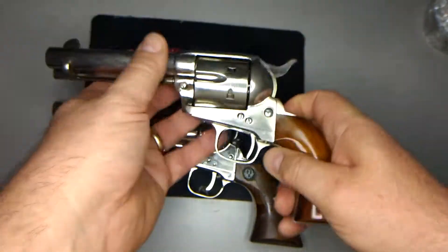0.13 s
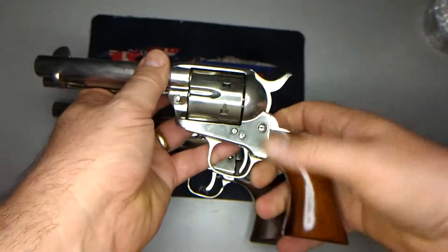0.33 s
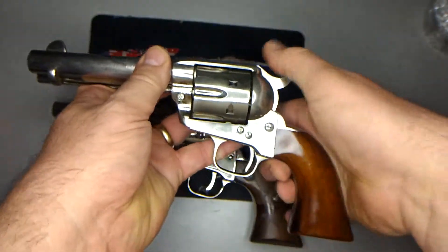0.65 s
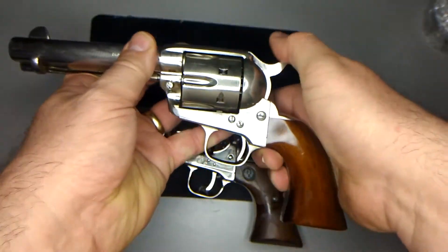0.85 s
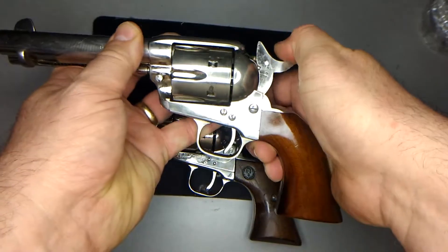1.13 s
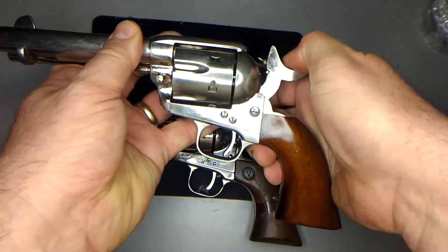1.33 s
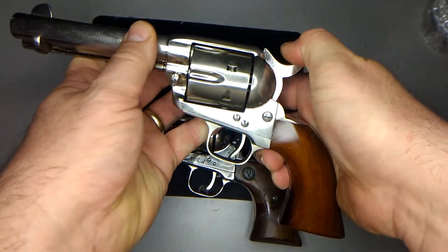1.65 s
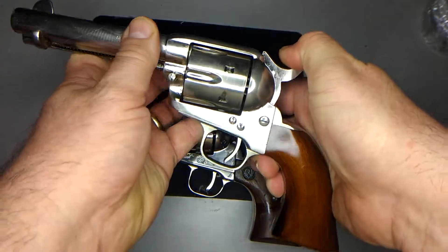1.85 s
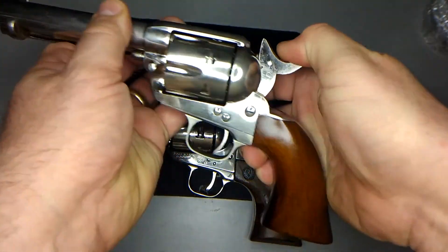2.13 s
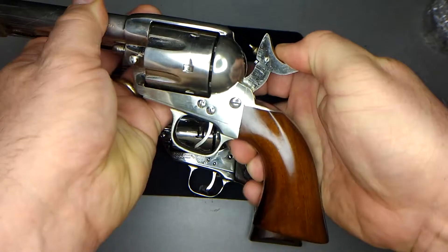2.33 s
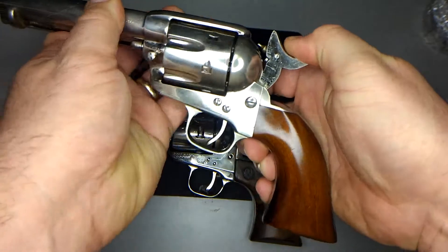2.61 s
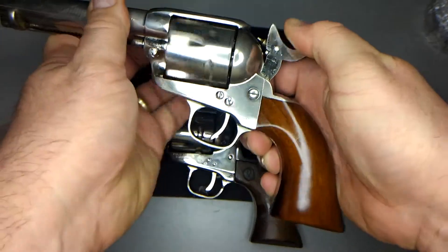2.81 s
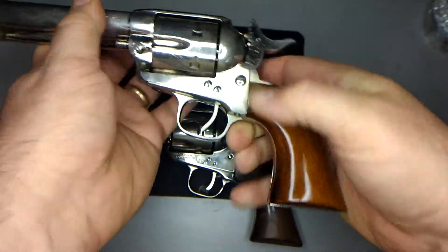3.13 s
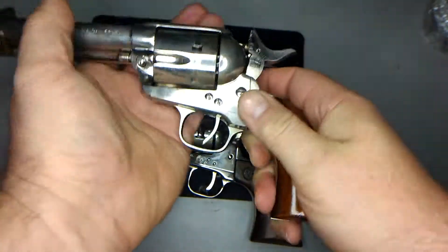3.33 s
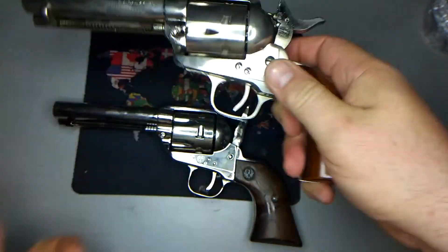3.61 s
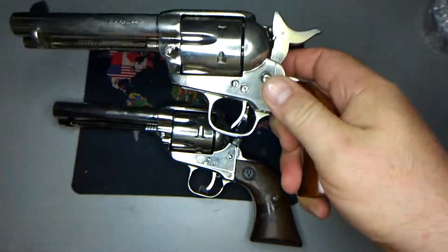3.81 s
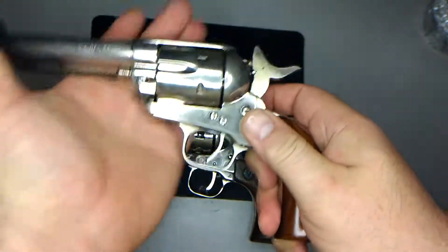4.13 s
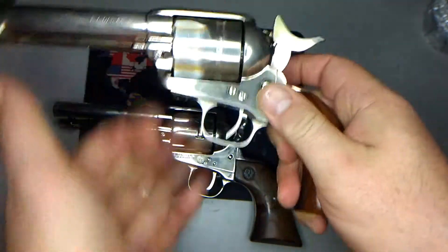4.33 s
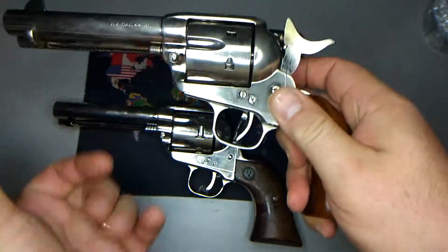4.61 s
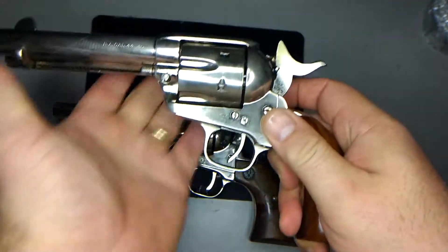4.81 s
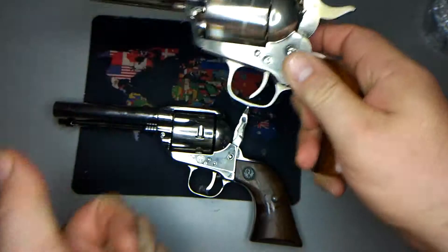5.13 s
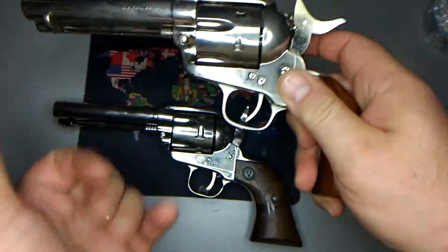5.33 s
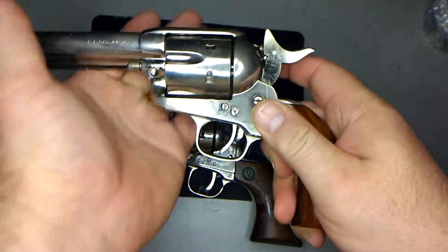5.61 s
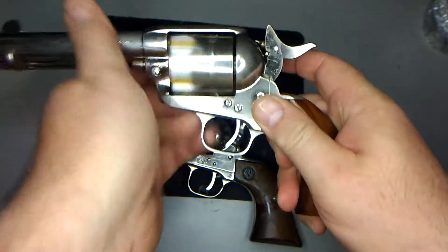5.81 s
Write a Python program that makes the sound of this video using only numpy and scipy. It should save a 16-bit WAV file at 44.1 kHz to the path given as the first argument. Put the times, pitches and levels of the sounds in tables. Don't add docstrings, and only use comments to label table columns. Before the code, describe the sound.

Close in a quiet room, hard metallic hammer clicks are followed by four quick whirring ratchet rattles of a hand-spun revolver cylinder.

```python
import sys
import numpy as np
from scipy import signal
from scipy.fft import rfft, irfft, next_fast_len
from scipy.io import wavfile
from scipy.ndimage import uniform_filter1d

SR = 44100
rng = np.random.default_rng(int(sys.argv[2]) if len(sys.argv) > 2 else 0)


def gain_from_db(level_db):
    decades = np.asarray(level_db, float) / 20
    return 10 ** decades


def dump(signal):
    limited = np.clip(np.atleast_2d(signal).T, -1, 1)
    pcm = np.round(limited * 32767).astype(np.int16)
    wavfile.write(sys.argv[1], SR, pcm)


N = 262832
CLICK_LEN = 8192

# (time [s], level [dB], brightness [dB])
SPINS = [
    (3.4691, -27, -0.5),
    (4.275, -28, -1),
    (5.0572, -25.5, -1.5),
    (5.829, -25.5, -2),
]
# (time [s], level [dB])
TEETH = [(3.5040, -30.5), (3.5226, -30), (3.54, -31), (3.558, -31.5), (3.5785, -31.5), (3.601, -28.5),
         (3.6315, -29.5), (4.3359, -29.5), (4.3575, -32.5), (4.3737, -33), (4.3907, -31), (4.41, -33),
         (4.43, -30.5), (4.4542, -31.5), (4.49, -33), (5.08, -31), (5.095, -31), (5.1100, -33),
         (5.1262, -30.5), (5.146, -32), (5.165, -31.5), (5.1895, -32.5), (5.2229, -32), (5.8472, -31),
         (5.864, -29.5), (5.8921, -33), (5.9295, -32)]
# (frequency [Hz], level [dB], t60 [s])
FRAME = [(1141, -9.5, 0.0098), (1282, -8, 0.0075), (2445, -6.5, 0.049), (2790, 0, 0.035),
         (3237, -5.5, 0.072), (3340, -15, 0.055), (3970, -9, 0.054)]
# (frequency [Hz], level [dB], t60 [s])
CYLINDER = [(4828, 2.5, 0.06), (5150, -38, 0.058), (5047, -1.5, 0.089), (5175, 3, .05), (5610, -0.5, 0.15),
            (5940, -11, 0.042), (6000, -30, 0.071), (6172, 2.5, 0.16), (7200, -5.5, 0.06),
            (7490, -1.5, .05), (7200, -17, 0.14), (8340, -8.5, 0.06)]


def hammer():
    # (time [s], level near 5.5 kHz [dB], then over that near 1.2, 3 and 8 kHz [dB])
    notches = [
        (1.0150, -26.5, 2.5, 12, -3),
        (1.6755, -30.5, -0.5, 3.5, 10),
        (1.6782, -36, -4, -1, -4),
        (2.3567, -28, -1, 12.5, 0),
        (2.8556, -25, -6, 6, 3.5),
    ]
    # (frequency [Hz], level [dB], t60 [s])
    sear_1 = [(870, -4, 0.019), (1410, -2, 0.016), (2210, 0, 0.032), (3195, 8.5, 0.017), (3650, -2, 0.014),
              (5710, -2.5, 0.031), (12450, -14, 0.013)]
    sear_2 = [(773, 0, 0.022), (3030, -4.5, 0.015), (4610, 9, 0.0062), (5930, -12, 0.0086),
              (7220, -8, 0.017)]
    sear_3 = [(1490, -0.5, 0.012), (2500, 4, 0.011), (3110, 13.5, 0.0074), (3280, -15, 0.028),
              (5840, -0.5, 0.019)]
    sear_4 = [(1270, -6.5, 0.01), (2650, 8, 0.0066), (3230, -27, 0.032), (5050, 12, 0.0067),
              (5380, 4, 0.0048), (6090, 5.5, 0.0112), (15500, -17, 0.0148)]
    top_db = -4
    out = np.zeros((2, N))
    for row, modes in zip(notches, (sear_1, sear_2, sear_2, sear_3, sear_4)):
        snap = click(tuple(row) + (top_db,), modes, ring_db=-8, scatter_db=.7, crack_s=.0011,
                     rattle_db=-16, snap_db=15, wet_db=-3)
        add(out, snap, row[0])
    return out


def cylinder():
    # (near 1.2 kHz [dB], 3 kHz [dB], 8 kHz [dB], 14 kHz [dB])
    tooth_colour = (-18.5, 2, 0.5, -4)
    low, body, edge, top = tooth_colour
    speed_bright_db = 1
    out = np.zeros((2, N))
    last = 0
    for s, db in sorted([tuple(row[:2]) for row in SPINS] + [tuple(row) for row in TEETH]):
        stroke_bright = [row[2] for row in SPINS if row[0] <= s][-1]
        bright = stroke_bright + speed_bright_db / (50 * (s - last))
        last = s
        row = (s, db, low - bright, body - bright, edge + bright, top + bright)
        tick = click(row, FRAME + CYLINDER, ring_db=-11, scatter_db=1.2, crack_s=.0006,
                     rattle_db=-8, snap_db=13, wet_db=1)
        add(out, tick, s)
    return out


def touches():
    # (time [s], level near 5.5 kHz [dB], then over that near 1.2, 3 and 8 kHz [dB])
    contacts = [
        (1.561, -64.5, 8, 7, 1),
        (4.2108, -62.5, 14.5, 15, -7),
        (4.6378, -47.5, -21, -3, -10),
        (5.3473, -69.5, 21, 13, -22),
    ]
    top_db = -9
    out = np.zeros((2, N))
    for row in contacts:
        touch = click(tuple(row) + (top_db,), FRAME + CYLINDER, ring_db=-32, scatter_db=3, crack_s=.003,
                      rattle_db=-6, snap_db=8, wet_db=0)
        add(out, touch, row[0])
    return out


def click(row, modes, ring_db, scatter_db, crack_s, rattle_db, snap_db, wet_db):
    t = np.arange(CLICK_LEN) / SR
    s, db, low, body, edge, top = row
    shape = np.exp(-t / crack_s) + gain_from_db(rattle_db) * np.exp(-t / .006)
    crack = gain_from_db(-4.5) * rng.standard_normal(CLICK_LEN) * shape * np.minimum(t / 0.00029, 1)
    crack[int(.0005 * SR)] += gain_from_db(snap_db)
    crack = colour(crack, [600, 1200, 1900, 3000, 4200, 5500, 8000, 10500, 14500],
                   [low - 18, low, low - 8, body, body - 8, 0, edge, top - 11, top])
    hz, mode_db, t60 = (column[:, None] for column in np.array(modes, float).T)
    strength, detune, phase = rng.standard_normal((3, len(modes), 1))
    gain = gain_from_db(ring_db + mode_db + scatter_db * strength)
    decay = gain_from_db(-60 * t / np.clip(t60, .008, .025))
    ring = gain * np.sin(2 * np.pi * (hz * (1 + .008 * detune) * t + phase)) * decay
    ring = ring.sum(axis=0) * np.minimum(t / 0.00058, 1)
    return heard(gain_from_db(db) * (crack + ring), wet_db)


def palm():
    # (time [s], level [dB], pitch [Hz], length [s])
    bumps = [
        (3.537, -54, 636, 0.0116),
        (3.545, -80, 278, 0.036),
        (4.22, -70, 302, .02),
        (4.375, -60.5, 410, 0.022),
        (4.64, -67, 720, 0.013),
        (5.10, -67.5, 403, 0.026),
        (5.35, -68, 700, 0.019),
        (5.88, -63, 339, .03),
    ]
    return puffs(bumps, width=0.41)


def creaks():
    # (time [s], level [dB], pitch [Hz], length [s])
    strains = [
        (.03, -81, 8500, 0.026),
        (1.36, -79, 7900, 0.024),
        (1.46, -87, 8100, .04),
        (1.56, -79.5, 8300, .03),
        (1.64, -78, 8200, 0.032),
        (1.79, -77.5, 8500, 0.013),
        (2.83, -82, 8000, 0.051),
        (3.02, -93, 8100, 0.029),
        (3.86, -78.5, 8500, 0.0085),
        (4.25, -85, 8200, 0.022),
    ]
    return puffs(strains, width=0.036)


def puffs(table, width):
    out = np.zeros(N)
    t = np.arange(CLICK_LEN) / SR
    for s, db, hz, length in table:
        band = signal.butter(2, [hz / (1 + width), hz * (1 + width)], "bandpass", fs=SR, output="sos")
        x = signal.sosfilt(band, rng.standard_normal(CLICK_LEN))
        swell = np.e * t / length * 2 * np.exp(-2 * t / length)
        add(out, gain_from_db(db) * x / x.std() * swell, s - length / 2)
    return out


def slide():
    # (hardest at [s], level [dB], lets go at [s])
    slides = [
        (0, -59.5, 0.3),
        (5.551, -72.5, 5.75),
    ]
    # (frequency [Hz], level [dB])
    rub_colour = [(300, -4), (800, -4), (1500, 0.5), (1750, 7), (2100, -6), (4500, -11), (9000, -61)]
    rise, fade, lift = 86, 38, 252
    t = np.arange(N) / SR
    push = np.zeros(N)
    for s, db, end in slides:
        pressing = rise * np.maximum(s - t, 0)
        easing = fade * np.maximum(t - s, 0)
        leaving = lift * np.maximum(t - end, 0)
        push += gain_from_db(db - pressing - easing - leaving)
    return colour(rng.standard_normal(N), *np.transpose(rub_colour)) * push * gain_from_db(6.5)


def heard(x, wet_db):
    near = room(1, lag=0, echo_db=2.5 + wet_db / 2, early_db=-37.5 + wet_db, tail_db=-19.5 + wet_db)
    far = room(-0.23, lag=22, echo_db=-14.0, early_db=-47.0, tail_db=-26 + wet_db)
    return signal.fftconvolve(x[None], np.array([near, far]), axes=1)[:, :len(x)]


def room(direct, lag, echo_db, early_db, tail_db):
    # (delay [s], level [dB])
    echoes = [
        (.0009, 2.5),
        (.0021, -11.5),
        (.0060, -6),
        (.0088, -2),
        (.0110, -10.5),
    ]
    t = np.arange(CLICK_LEN) / SR
    response = np.zeros(CLICK_LEN)
    response[lag] = direct
    for s, db in echoes:
        response[int(s * SR)] += gain_from_db(db + echo_db - 10.0)
        scatter = rng.standard_normal(CLICK_LEN) * (t > s) * np.exp(-np.maximum(t - s, 0) / 0.00051)
        response += gain_from_db(db + echo_db - 12.0) * scatter
    early = gain_from_db(early_db) / (1 + np.exp(np.minimum((t - .012) / 0.00091, 50)))
    tail = gain_from_db(tail_db - 60 * t / .13)
    diffuse = rng.standard_normal(CLICK_LEN) * (early + tail) * np.minimum(t / 0.0027, 1)
    return response + colour(diffuse, [500, 2000, 6000, 15000], [-8, -1.5, -2.5, -1.5])


def hiss():
    # (frequency [Hz], level [dB])
    hiss_colour = [(32, -16), (58, -3.5), (130, 2.5), (1000, -17.5), (2500, -26), (6000, -37), (10500, -48),
                   (15500, -39)]
    # (frequency [Hz], level [dB])
    electronics = [(300, -69.5), (2000, -58.5), (6000, -66), (10500, -75), (15500, -66.5)]
    riding = colour(rng.standard_normal((2, N)), *np.transpose(hiss_colour))
    steady = colour(rng.standard_normal((2, N)), *np.transpose(electronics)) * gain_from_db(-11)
    return riding / riding.std() * gain_from_db(gain_db() + np.array([[7.5], [5.5]])) + steady


def gain_db():
    # (time [s], fall [dB], fall time [s])
    ducks = [
        (.15, 4.5, 0.86),
        (1.68, 6.5, 0.048),
        (2.36, 3, 0.02),
        (2.86, 11.5, 0.021),
        (3.47, 5.5, 0.18),
        (4.27, 6.5, .25),
        (5.06, 4.5, 0.28),
        (5.83, 3.5, 0.081),
    ]
    ceiling_db, recover_db_s = -58, 8.5
    tooth_db, tooth_s = 1.2, 0.038
    times, levels = [0], [ceiling_db]
    for start, fall_db, length in ducks:
        last_s, last_db = times[-1], levels[-1]
        full = last_s + (ceiling_db - last_db) / recover_db_s
        before = min(last_db + recover_db_s * (start - last_s), ceiling_db)
        times += [min(full, start), start, start + length]
        levels += [before, before, before - fall_db]
    t = np.arange(N) / SR
    since = t - np.array([row[0] for row in SPINS + TEETH])[:, None]
    dips = np.exp(-np.abs(since) / tooth_s) * (since > 0)
    return np.interp(t, times, levels) - tooth_db * dips.sum(axis=0)


def colour(x, hz, db):
    f = np.log(np.arange(1, 1026) * SR / 2050)
    cep = irfft(np.log(gain_from_db(np.interp(f, np.log(hz), db))))
    cep[1:1024] *= 2
    cep[1025:] = 0
    kernel = irfft(np.exp(rfft(cep)))[:512]
    if x.ndim > 1:
        kernel = kernel[None]
    return signal.fftconvolve(x, kernel)[..., :x.shape[-1]]


def add(track, x, s):
    i = max(int(s * SR), 0)
    track[..., i:i + x.shape[-1]] += x[..., :N - i]


def scene():
    gun = hammer() + cylinder() + touches()
    hands = heard(palm() + creaks() + slide(), wet_db=0)
    return gun + hands + hiss()


def top_cut(x):
    return signal.sosfilt(signal.butter(12, 16650, fs=SR, output="sos"), x)


def record(dry):
    # (frequency [Hz], share [ratio])
    cross_feed = [(60, .44), (400, .55), (1100, .78), (2200, .75), (4400, .62), (7000, .56), (16000, .62)]
    size = next_fast_len(N)
    hz, share = np.transpose(cross_feed)
    feed = np.interp(np.log(np.arange(1, size // 2 + 2) * SR / size), np.log(hz), share)
    crossed = np.roll(dry[::-1], 20, axis=1)
    wide = dry - irfft(rfft(crossed, size) * feed, size)[:, :N]
    low_pass = signal.ellip(8, .2, 45, 15900, fs=SR, output="sos")
    wide = signal.sosfilt(low_pass, wide)
    offset_db = uniform_filter1d(gain_db(), size=400) + np.array([[17.], [-11.]])
    offset = gain_from_db(offset_db) * np.array([[1], [-1]])
    return top_cut(wide + offset)


dry = scene()
out = record(dry)
dump(out)
```